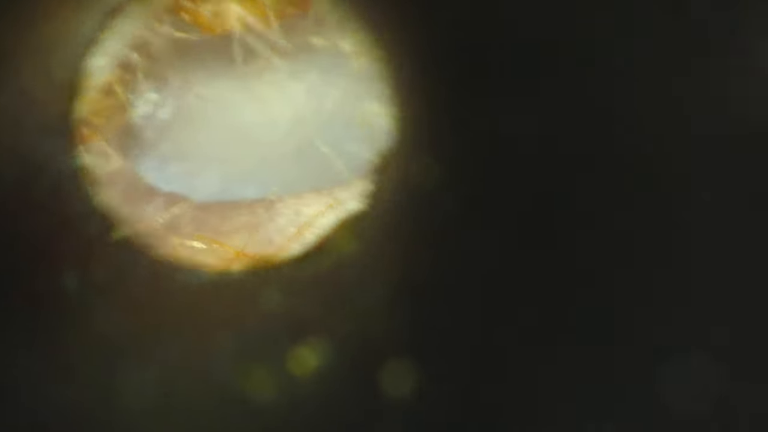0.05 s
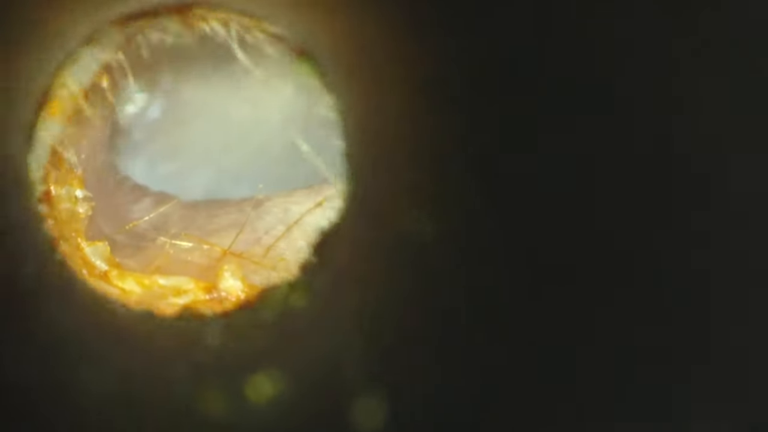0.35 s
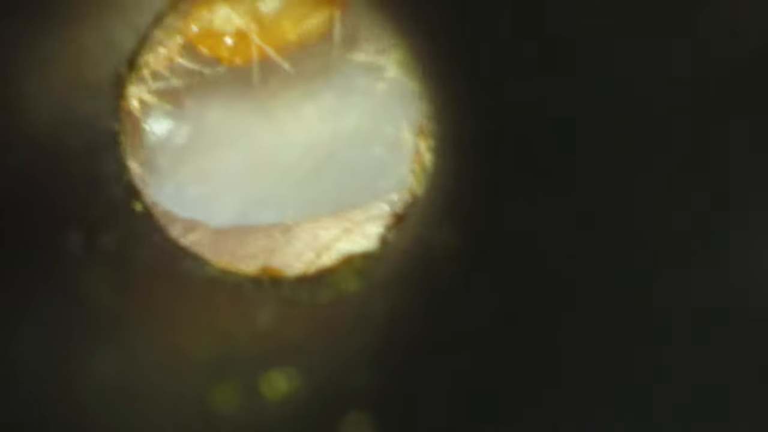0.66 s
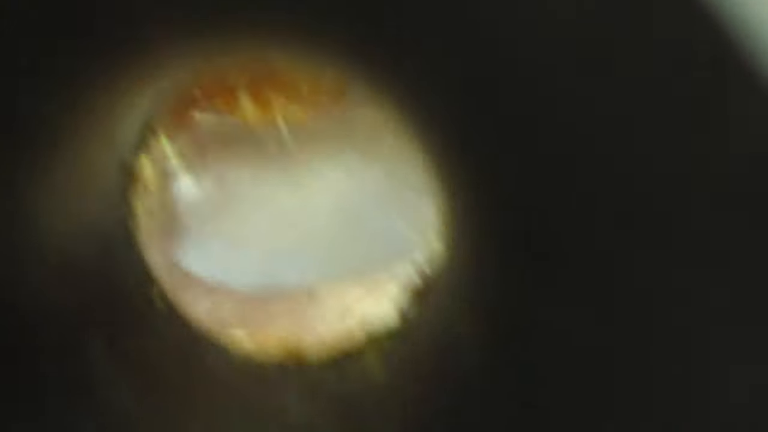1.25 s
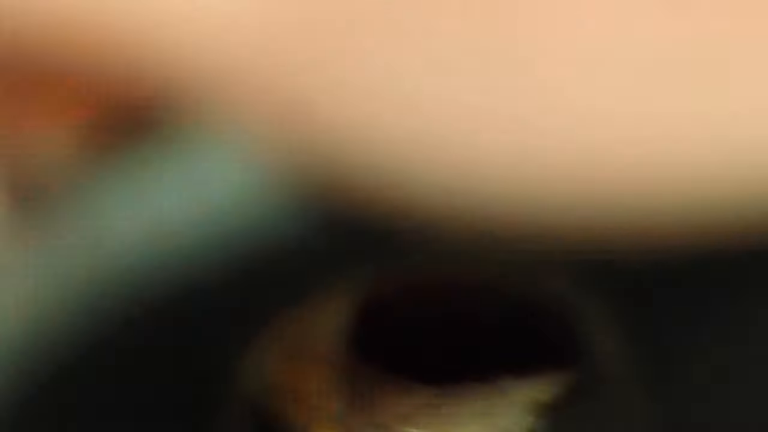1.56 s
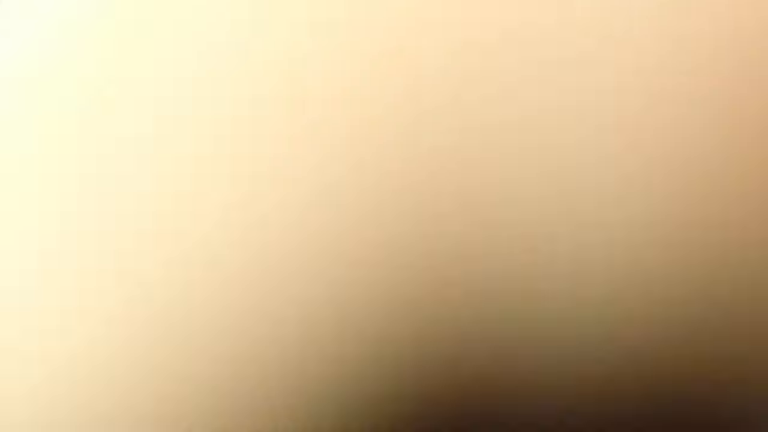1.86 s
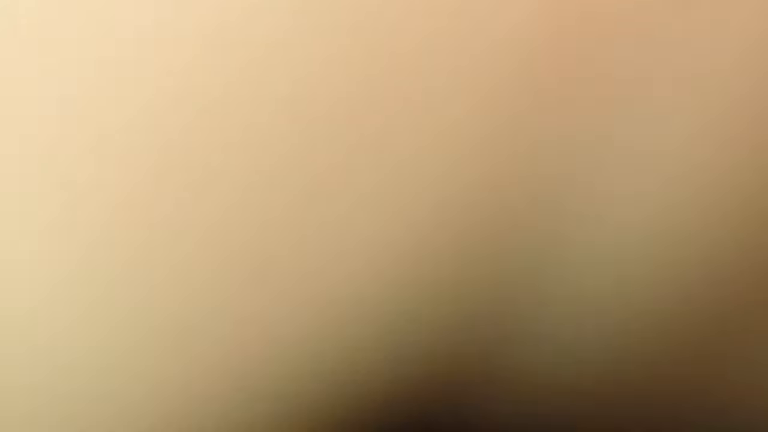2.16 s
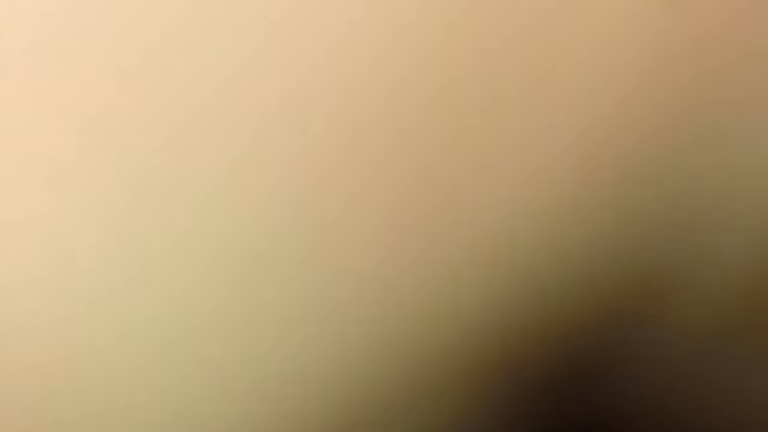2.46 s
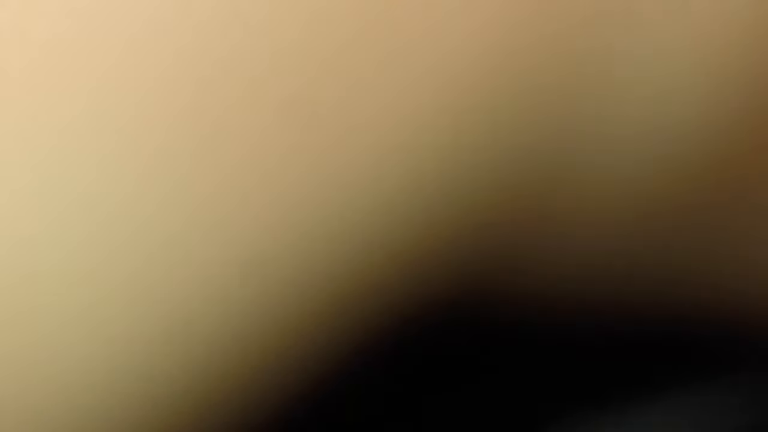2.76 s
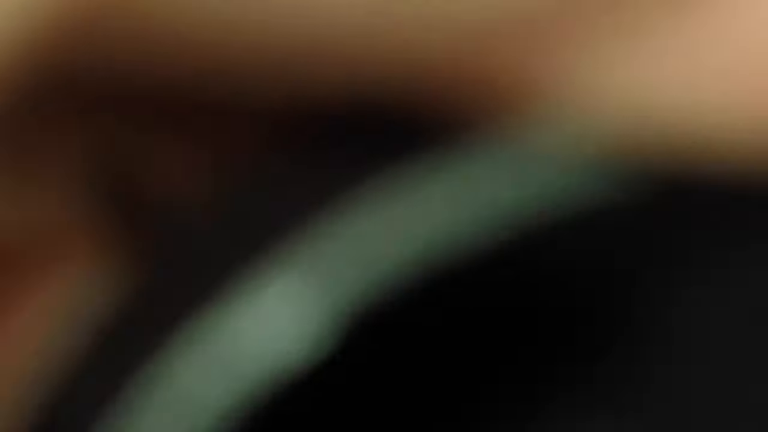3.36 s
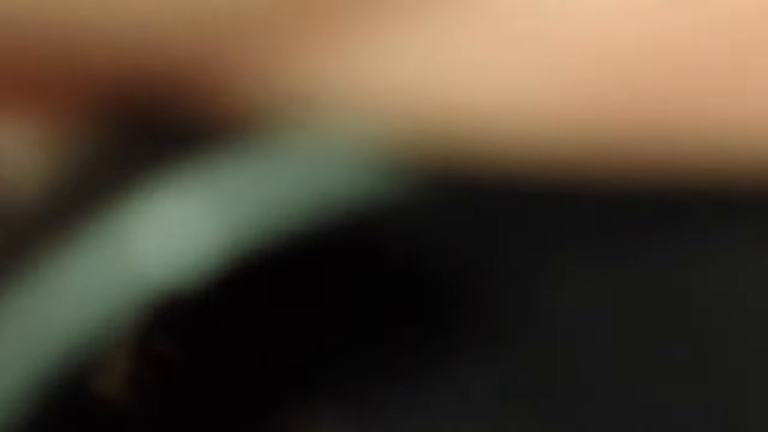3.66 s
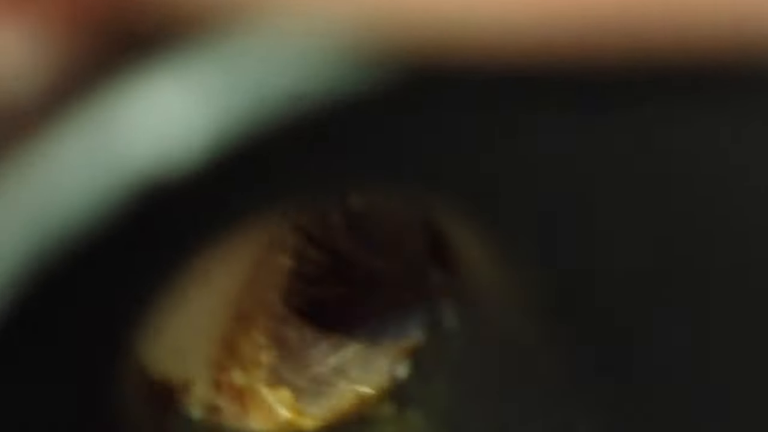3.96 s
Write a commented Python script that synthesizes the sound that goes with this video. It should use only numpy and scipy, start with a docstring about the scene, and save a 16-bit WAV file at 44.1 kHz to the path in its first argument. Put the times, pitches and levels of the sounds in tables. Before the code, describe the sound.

A suction machine hums and hisses until the hiss cuts off, leaving the low hum.

```python
"""A medical suction machine runs in a clinic while an ear is cleaned. From the start its pump throbs
29 times a second, each stroke exciting housing and valve, while air hisses and whistles into the nozzle.
Just after 1.1 s an instrument knocks softly twice, then clicks once and rings briefly.
From about 2.2 s the flow is pinched and the nozzle's resonances change, so the hiss grows harsher.
Near 3.35 s the flow is blocked and the hiss stops at once, leaving the pump's hum."""
import sys
import numpy as np
from scipy import signal
from scipy.fft import rfft, irfft, next_fast_len
from scipy.io import wavfile
from scipy.ndimage import map_coordinates

SR = 44100
rng = np.random.default_rng(int(sys.argv[2]) if len(sys.argv) > 2 else 0)


def digitize_waveform(pressure):
    """Quantize a signal to 16-bit integers and store it at the path in sys.argv[1].

    Rows of a 2-D input are taken as channels; values are limited to [-1, 1].
    """
    field = np.atleast_2d(pressure).T
    bounded = np.clip(field, -1, 1)
    quanta = np.round(bounded * 32767).astype(np.int16)
    wavfile.write(sys.argv[1], SR, quanta)


N = 176400

PUMP_HZ, MAINS_HZ, TOP_HZ = 29.156, 60, 15330
STROKE_S = 0.0119  # first pressure peak
INTAKE_LEAD_S, HOUSING_LEAD_S, VALVE_LEAD_S = 0.0136, 0.00382, 0.00071  # ahead of each pressure peak
THROB_DB, INTAKE_DB, VALVE_DB, CASING_DB = -28.5, -36.5, -50, -40
WHINE_ORDERS, WHINE_DB = (32, 33, 62), (-54.5, -52.5, -67)
HISS_SPLIT_HZ = (6120, 11170)  # borders of the low, middle and high bands
KNOCK_RISE_S, KNOCK_SCRAPE_DB = 0.0044, -16

# partials of the pressure wave: harmonic_number, relative_db
THROB_PARTIALS = [(1, 2.5), (2, -8.5), (3, -11.5), (4, -11.5)]
# response of the intake: frequency_hz, gain_db
INTAKE_RESPONSE = [(60, -26.5), (117, -32.5), (146, 2.5), (175, -7), (204, -8.5), (233, -17.5), (300, -63),
                   (600, -81.5), (2000, -120)]
# response of the housing: frequency_hz, gain_db
HOUSING_RESPONSE = [(100, -48), (204, -58.5), (233, -11), (262, -4), (292, -4), (321, 4), (350, -2.5),
                    (379, -20.5), (408, -15), (440, -23.5), (520, -33), (620, -47), (1200, -120)]
# envelope of the housing's ring: time_s, level_db
HOUSING_LEVEL = [(0, -34), (1.2, -34), (1.6, -35.5), (2.7, -35), (3.4, -34), (4, -34)]
# response of the valve: frequency_hz, gain_db
VALVE_RESPONSE = [(400, -34.5), (660, -32.5), (700, -13), (760, -14.5), (816, 1.5), (875, -7.5), (950, 7.5),
                  (1000, 3), (1100, -21.5), (1740, -37), (1810, -4), (1900, -25.5), (2400, -48),
                  (8000, -100)]
# partials of the motor's hum: harmonic_number, level_db
HUM_PARTIALS = [(1, -58), (2, -57)]
# broad spectrum of the air in the casing: frequency_hz, gain_db
CASING_SLOPE = [(15, 23), (55, 19.5), (90, 12.5), (220, 6), (290, 6.5), (335, 27), (410, 8), (620, -16.5),
                (800, 2), (930, 6.5), (1100, -11.5), (2400, -33), (5000, -27.5), (10000, -22.5),
                (15000, -28)]
# resonances of the casing: centre_hz, width_hz, boost_db
CASING_RESONANCES = [(1737, 600, 20.4), (2130, 350, 9.1), (2713, 520, 19.1), (3620, 610, 17.2),
                     (4800, 1300, 11.6), (6080, 410, 11), (7240, 640, 7.2)]
# broad spectrum of the hiss, open and pinched: frequency_hz, gain_db
OPEN_HISS_SLOPE = [(400, -29), (1100, -6.5), (2400, -12.5), (5000, -2), (10000, -8), (15000, 0)]
PINCHED_HISS_SLOPE = [(400, -52), (1100, 0.5), (2400, -8), (5000, -0.5), (10000, -2.5), (15000, 0)]
# resonances of the nozzle, open and pinched: centre_hz, width_hz, boost_db
OPEN_RESONANCES = [(1567, 1170, 13), (2980, 150, 13.5), (3423, 400, 14), (4730, 430, 7), (6000, 430, 12),
                   (6440, 320, 8), (7014, 99, 12.5), (8320, 220, 8.5), (9820, 860, 11.5), (11490, 660, 9.5),
                   (12020, 200, 16.5), (12680, 450, 12.5), (13160, 280, 9), (13880, 300, 10),
                   (14650, 530, 12.5)]
PINCHED_RESONANCES = [(1770, 900, 18.3), (2927, 134, 15.8), (3530, 390, 17.3), (4750, 990, 12.3),
                      (6180, 950, 13.5), (8240, 950, 13.3), (9900, 650, 6.7), (11450, 640, 11.3),
                      (13140, 1200, 14.8), (15100, 650, 8.5)]
# pinched part of the hiss: time_s, power_share
PINCH_SHARE = [(0, 0.13), (1.7, 0), (2.2, 0.07), (2.6, 0.44), (2.95, 0.76), (3.15, 0.99)]
# envelopes of the three hiss bands: time_s, low_db, middle_db, high_db
HISS_LEVELS = [(0, -51.5, -50, -47), (1.1, -50.5, -50, -47.5), (1.801, -50.5, -48, -49.5),
               (2.0, -51, -49, -47), (2.6, -50, -50, -44.5), (2.9, -49, -48, -46.5),
               (2.982, -47, -49.5, -40.5), (2.994, -60, -51, -55), (3.003, -54, -55, -54),
               (3.009, -48.5, -43.5, -44), (3.06, -45.5, -43, -41), (3.1, -47.5, -47, -45),
               (3.24, -47.5, -44.5, -38.5), (3.305, -44, -37.5, -51), (3.341, -45, -44.5, -48),
               (3.39, -68, -63, -76), (3.45, -79, -70, -84), (3.7, -74, -78, -78), (4, -88, -87, -100)]
# whistles in the nozzle: start_s, end_s, pitch_hz, half_width_hz, level_db
WHISTLE_TONES = [(0, 2.1, 6035, 22, -61), (0, 2.1, 3365, 25, -61), (1.95, 2.6, 9480, 70, -60),
                 (2.2, 2.9, 4810, 60, -60), (2.1, 2.9, 8480, 70, -59), (2.925, 2.985, 3520, 130, -49),
                 (3.12, 3.32, 13230, 260, -46), (3.11, 3.28, 14880, 280, -44), (3.17, 3.28, 3460, 160, -51),
                 (3.27, 3.335, 8500, 130, -42)]
# soft blows of the instrument: start_s, level_db
KNOCK_HITS = [(1.1255, -28), (1.142, -34)]
# hollow tone of a knock: pitch_hz, relative_db
KNOCK_PARTIALS = [(990, -2.5), (1440, -14)]
# spectrum of the scrape after a knock: frequency_hz, gain_db
SCRAPE_SPECTRUM = [(200, -26), (980, -3), (1500, -7), (4000, -56)]
# sharp contact of the instrument: start_s, level_db
CLICK_HITS = [(1.1934, -28.5)]
# spectrum of the click: frequency_hz, gain_db
CLICK_SPECTRUM = [(450, 8.5), (750, -3.5), (1200, 5), (2050, -7), (2450, -18), (3000, 4), (3900, -0.5),
                  (5300, -7), (6400, 1.5), (8500, -20), (9800, -4), (11000, -30)]
# metallic modes of the instrument: pitch_hz, below_click_db, t60_s
RING_MODES = [(1476, 5.5, 0.11), (4860, 15.5, 0.22)]


def amp(db):
    """Decibels to amplitude ratio."""
    return 10 ** (np.asarray(db) / 20)


def unit(x):
    """Normalisation to rms 1."""
    return x / np.sqrt(np.mean(x ** 2) + 1e-20)


def along(points, hz):
    """Interpolation of a spectrum on a logarithmic frequency axis."""
    f, db = np.transpose(points)
    return np.interp(np.log(hz + 1), np.log(f + 1), db)


def curves(rows):
    """Piecewise linear envelopes, one for each column after the time."""
    times, *columns = np.transpose(rows)
    return [np.interp(np.arange(N) / SR, times, column) for column in columns]


def wobble(rate):
    """Smooth random modulation, rate knots a second."""
    return map_coordinates(rng.standard_normal(int(N * rate / SR) + 4), [np.arange(N) * rate / SR])


def wavering(x):
    """Frequency modulation: the pitch drifts by about 0.3 percent."""
    return map_coordinates(x, [np.cumsum(1 + 0.003 * wobble(3))], order=5, mode="mirror")


def filtered(x, response):
    """Zero-phase filtering by a function of frequency."""
    size = next_fast_len(len(x) + SR // 2)
    return irfft(rfft(x, size) * response(np.fft.rfftfreq(size, 1 / SR)), size)[:len(x)]


def below(x, hz):
    """Steep low-pass."""
    return filtered(x, lambda f: 1 / (1 + (f / hz) ** 20))


def rung(x, spectrum):
    """Minimum-phase filtering: the ringing follows its excitation."""
    size = 32768
    cepstrum = irfft(np.log(amp(along(spectrum, np.fft.rfftfreq(size, 1 / SR)))))
    cepstrum[1:size // 2] *= 2
    cepstrum[size // 2 + 1:] = 0
    return signal.fftconvolve(x, irfft(np.exp(rfft(cepstrum))))[:len(x)]


def air(slope, resonances):
    """Source and filter: flow noise of rms 1 with resonances standing on a slope."""
    def boost(f):
        return sum(db / (1 + (2 * (f - hz) / width) ** 2) for hz, width, db in resonances)
    return unit(filtered(rng.standard_normal(N), lambda f: amp(along(slope, f) + boost(f))))


def reflected(x, t60, wet_db):
    """Reverberation: near surfaces add a dense, exponentially decaying tail."""
    t = np.arange(SR // 3) / SR
    tail = rng.standard_normal(len(t)) * amp(-60 * t / t60) * (t > .002)
    wet = signal.fftconvolve(x, tail / np.linalg.norm(tail))[:len(x)]
    return (x + amp(wet_db) * wet) / np.hypot(1, amp(wet_db))


def strokes(lead_s, scatter_db, jitter_s=0.00003):
    """Nearly periodic impulse train, one pulse a stroke, with a second of run-in."""
    k = np.arange(-int(PUMP_HZ) + 1, int(N / SR * PUMP_HZ) + 1)
    late, size = rng.standard_normal((len(k), 2)).T
    at = np.round((1 + STROKE_S - lead_s + k / PUMP_HZ + jitter_s * late) * SR).astype(int)
    return np.bincount(np.maximum(at, 0), amp(scatter_db * size), N + SR)[:N + SR]


def contacts(hits, spectrum, t60, tail_db, tail_t60):
    """Contact noise: each burst is the sum of a fast decay and a fainter, slow one."""
    out = np.zeros(N)
    for start, db in hits:
        t = np.arange(N) / SR - start
        age = np.maximum(t, 0)
        envelope = (t >= 0) * (amp(-60 * age / t60) + amp(tail_db - 60 * age / tail_t60))
        grit = rng.standard_normal(N)
        out += amp(db) * rung(envelope * grit, spectrum) / np.std(rung(grit, spectrum))
    return out


def throb(shaft_phase):
    """Periodic pumping makes a harmonic pressure wave; the tubing delays higher partials more."""
    partials = (amp(db + 0.087 * wobble(7.26)) * np.cos(k * shaft_phase - 0.67 * (k - 1) ** 2)
                for k, db in THROB_PARTIALS)
    return amp(THROB_DB) * unit(sum(partials))


def intake():
    """Impulse excitation: each intake rings a low, booming resonance."""
    gulps = strokes(INTAKE_LEAD_S, scatter_db=0.45)
    return amp(INTAKE_DB) * unit(rung(gulps, INTAKE_RESPONSE)[SR:])


def housing():
    """Forced vibration: each exhaust stroke kicks the modes of the housing."""
    kicks = strokes(HOUSING_LEAD_S, scatter_db=1.04)
    return amp(curves(HOUSING_LEVEL)[0]) * unit(rung(kicks, HOUSING_RESPONSE)[SR:])


def valve():
    """Repeated impacts, each trailing noise, drive the valve's resonances into a buzz."""
    flaps = strokes(VALVE_LEAD_S, scatter_db=1.0)
    decay = signal.lfilter([1], [1, -np.exp(-1 / (SR * 0.058))], flaps)
    rasp = decay * rng.standard_normal(N + SR)
    drive = unit(flaps) + 0.25 * unit(rasp)
    return amp(VALVE_DB) * unit(rung(drive, VALVE_RESPONSE)[SR:])


def whine(shaft_phase):
    """High harmonics of the shaft rate sing on, modulated in amplitude and phase."""
    out = np.zeros(N)
    for order, db in zip(WHINE_ORDERS, WHINE_DB):
        flutter_db = wobble(26.16)
        wander_rad = 0.69 * wobble(21.88)
        out += amp(db) * unit(amp(flutter_db) * np.sin(order * shaft_phase + wander_rad))
    return out


def motor_hum(t):
    """The motor vibrates at harmonics of the mains frequency."""
    return sum(amp(db) * np.sqrt(2) * np.sin(2 * np.pi * (k * MAINS_HZ * t + rng.random()))
               for k, db in HUM_PARTIALS)


def casing_air(t):
    """Flow noise resonates in the casing; the strokes modulate the amplitude of its low band."""
    rush = air(CASING_SLOPE, CASING_RESONANCES)
    low = below(rush, 2400)
    puff_db = -2 * np.cos(2 * np.pi * PUMP_HZ * (t - STROKE_S - 0.005))
    return amp(CASING_DB) * (low * amp(puff_db) + rush - low)


def nozzle_hiss():
    """Turbulence excites the nozzle's resonances; pinching recolours the hiss and blocking ends it."""
    pinch = np.clip(curves(PINCH_SHARE)[0], 0, 1)
    free = reflected(air(OPEN_HISS_SLOPE, OPEN_RESONANCES), t60=0.092, wet_db=0.5)
    tight = reflected(air(PINCHED_HISS_SLOPE, PINCHED_RESONANCES), t60=0.031, wet_db=-4.5)
    jet = wavering(np.sqrt(1 - pinch) * free + np.sqrt(pinch) * tight)
    low, low_and_middle = (below(jet, hz) for hz in HISS_SPLIT_HZ)
    bands = low, low_and_middle - low, jet - low_and_middle
    hiss = sum(amp(db) * unit(band) for db, band in zip(curves(HISS_LEVELS), bands))
    return hiss * amp(0.61 * wobble(11.82))


def whistles(t):
    """Sharp resonance: the flow sings in the nozzle as narrow bands of noise."""
    out = np.zeros(N)
    for start, end, hz, half_width, db in WHISTLE_TONES:
        tone = unit(filtered(rng.standard_normal(N), lambda f: 1 / (1 + ((f - hz) / half_width) ** 2)))
        fade = np.clip(np.minimum(t - start, end - t) / 0.032 + .5, 0, 1)  # 32 ms ramps
        out += amp(db) * wavering(tone) * fade
    return out


def knocks(t):
    """Heavy damping leaves each soft blow a few cycles of hollow tone, then a faint scrape."""
    out = np.zeros(N)
    for start, db in KNOCK_HITS:
        rise = np.maximum(t - start, 0) / KNOCK_RISE_S
        swell = rise ** 2 * np.exp(1 - rise ** 2)
        tone = sum(amp(db + level) * np.sin(2 * np.pi * hz * (t - start)) for hz, level in KNOCK_PARTIALS)
        out += swell * tone
    scrape = contacts(KNOCK_HITS, SCRAPE_SPECTRUM, t60=0.018, tail_db=-2.5, tail_t60=0.24)
    return out + amp(KNOCK_SCRAPE_DB) * scrape


def click(t):
    """A sharp contact gives a broadband burst, and the metal's modes ring on in free decay."""
    out = contacts(CLICK_HITS, CLICK_SPECTRUM, t60=0.035, tail_db=-9.0, tail_t60=0.18)
    for start, db in CLICK_HITS:
        age = np.maximum(t - start, 0)
        for hz, drop_db, t60 in RING_MODES:
            out += amp(db - drop_db - 60 * age / t60) * np.sin(2 * np.pi * hz * age)
    return out


def scene():
    """Superposition of the machine, the nozzle and the instrument's contacts."""
    t = np.arange(N) / SR
    shaft_phase = 2 * np.pi * PUMP_HZ * (t - STROKE_S)
    pump = throb(shaft_phase) + intake() + housing() + valve()
    machine = pump + whine(shaft_phase) + motor_hum(t) + casing_air(t)
    return (machine + nozzle_hiss() + whistles(t) + knocks(t) + click(t))[None]


def record(dry):
    """Band limiting: an ideal low-pass removes everything above TOP_HZ."""
    return filtered(dry[0], lambda hz: hz < TOP_HZ)[None]


dry = scene()
out = record(dry)
digitize_waveform(out)
```